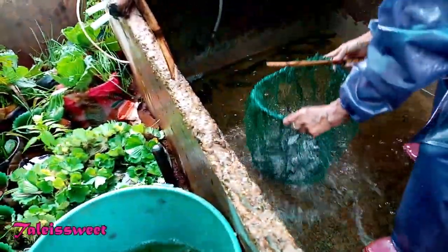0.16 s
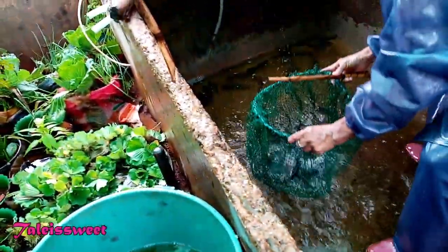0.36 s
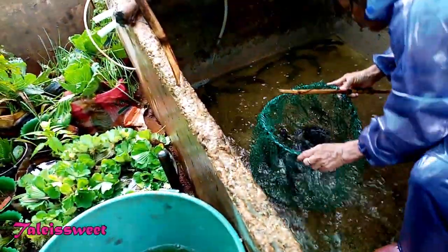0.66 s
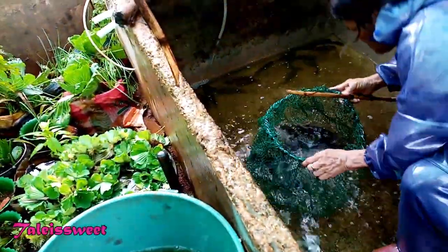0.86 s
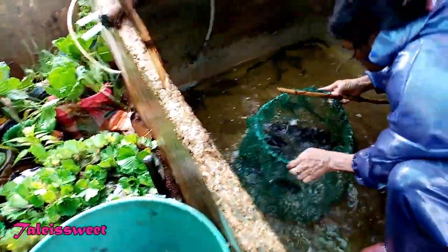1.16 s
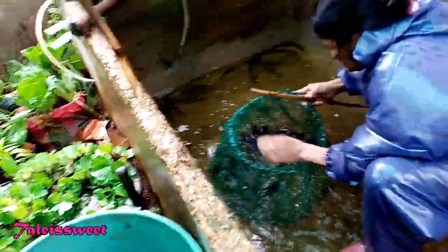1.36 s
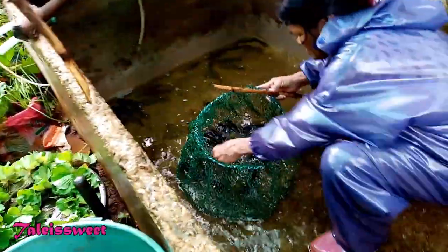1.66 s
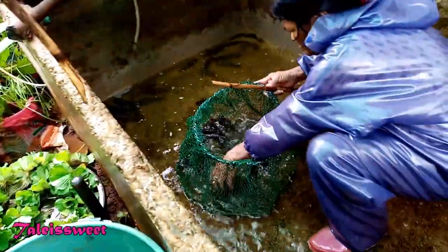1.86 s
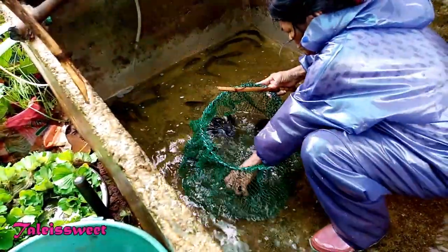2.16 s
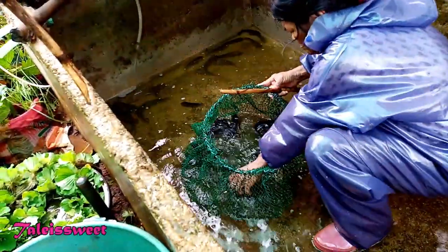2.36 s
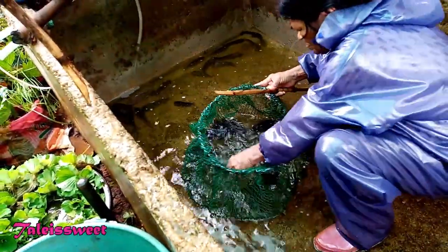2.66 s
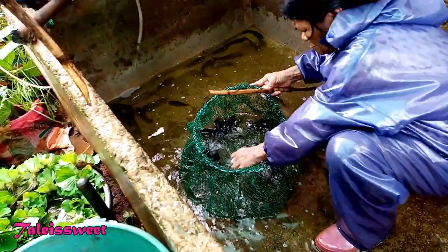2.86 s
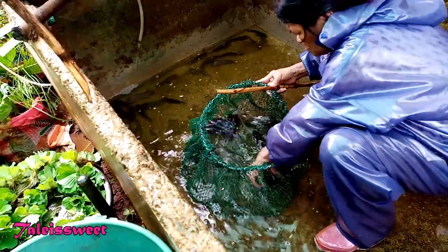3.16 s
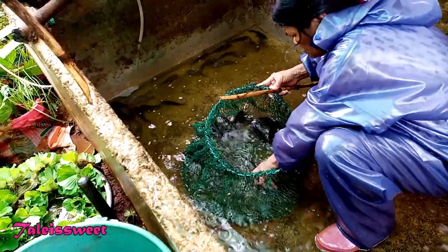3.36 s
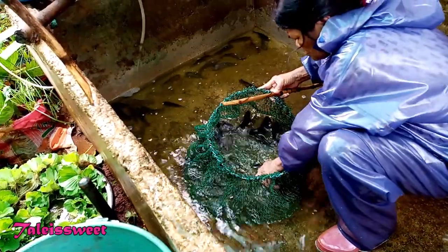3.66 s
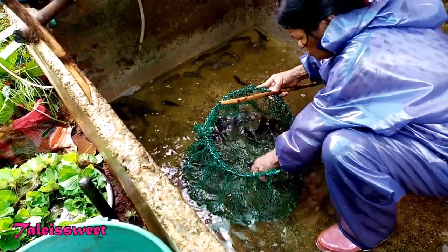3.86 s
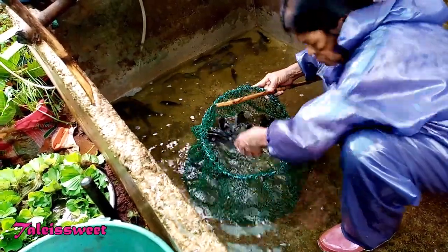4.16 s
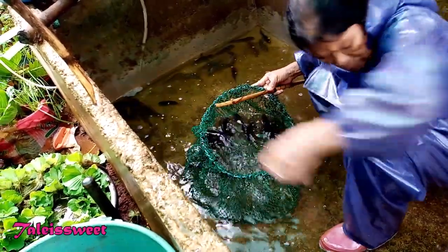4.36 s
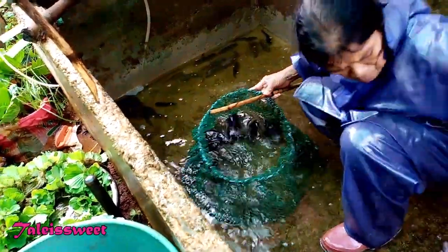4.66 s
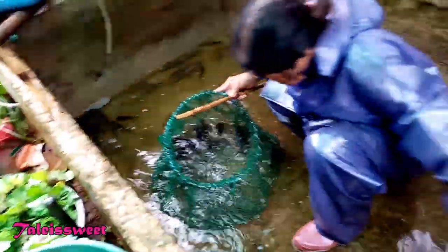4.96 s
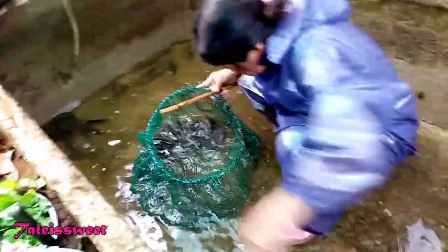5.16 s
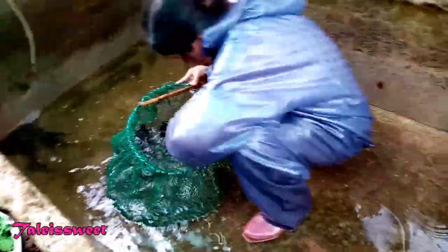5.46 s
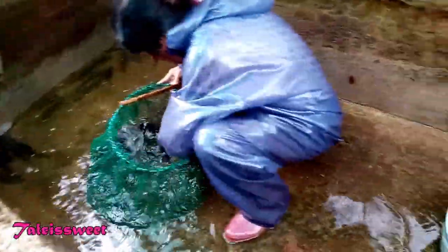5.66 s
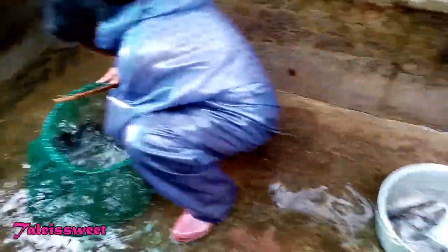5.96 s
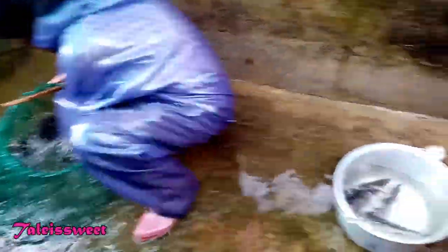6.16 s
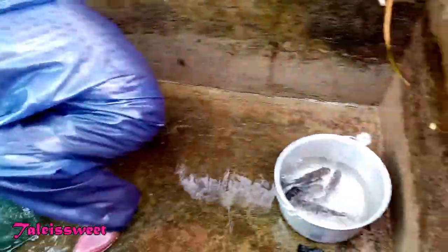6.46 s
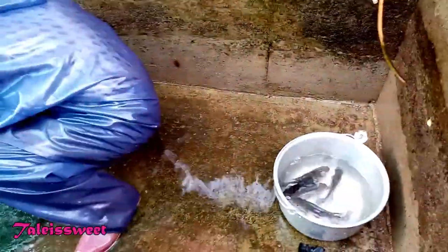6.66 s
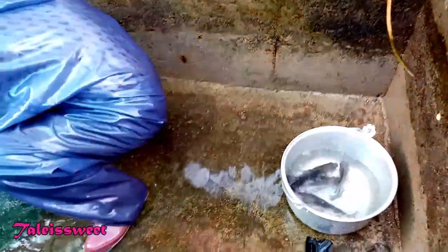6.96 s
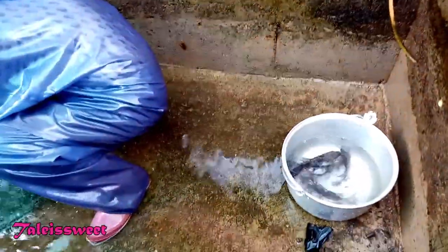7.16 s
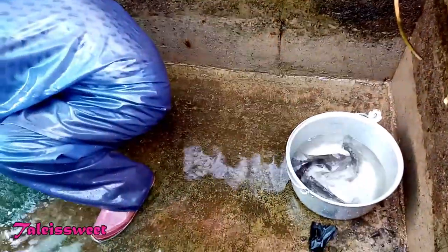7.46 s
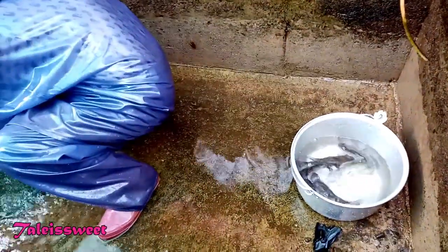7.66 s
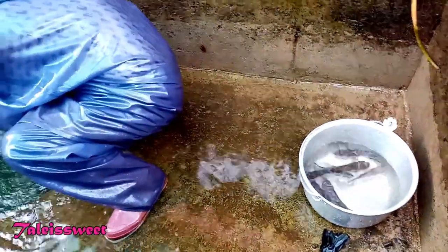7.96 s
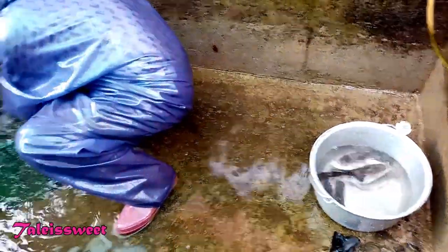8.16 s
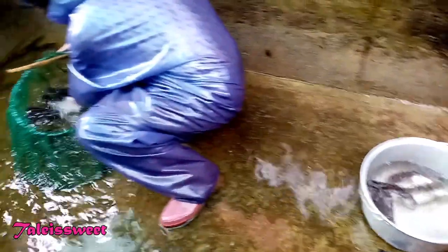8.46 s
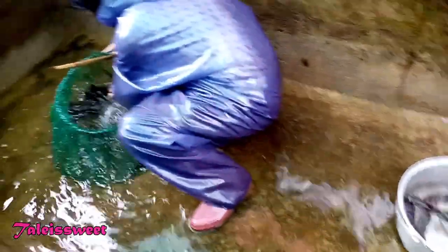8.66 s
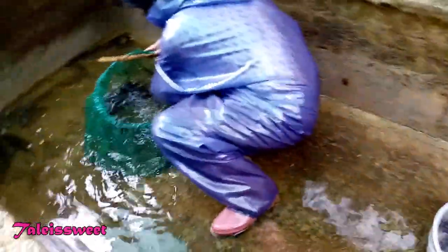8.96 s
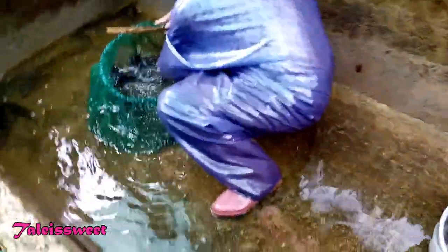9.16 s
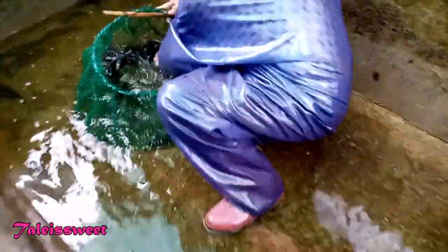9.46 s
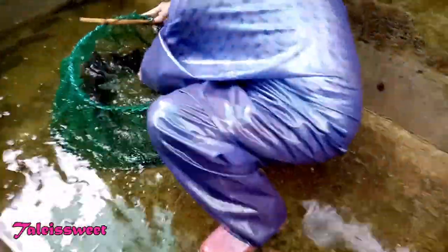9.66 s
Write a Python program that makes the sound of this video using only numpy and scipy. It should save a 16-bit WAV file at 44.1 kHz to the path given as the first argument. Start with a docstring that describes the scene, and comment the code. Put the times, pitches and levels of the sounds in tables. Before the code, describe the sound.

Close splashing in shallow water comes in short, uneven bursts as a hand moves through a net of wriggling fish. Bubbles gurgle, tails slap and drops ping between strokes. The splashes start strong, settle, then turn busier and louder in the second half, with a few hollow laps and dull gulps. Concrete pond walls add a brief echo, and a far motor hums faintly under light hiss.

```python
"""Fish thrash in a hand net in the shallow water of a concrete pond while someone gropes among them.
Each stroke folds in air, which resonates as gurgling bubbles, and throws spray over a steady trickle.
Tails slap, drops fall, air pockets plop, water laps hollowly, and there are a few dull knocks and gulps.
Reflections from the pond walls add a short ring; a far motor's hum and faint hiss lie below.
Of the two spaced microphone ports, the left is shielded and duller."""
import sys
import numpy as np
from scipy import signal
from scipy.fft import rfft, irfft
from scipy.io import wavfile
from scipy.ndimage import uniform_filter1d, map_coordinates

SR = 44100
rng = np.random.default_rng(int(sys.argv[2]) if len(sys.argv) > 2 else 0)


def inscribe(sig):
    """Save sig as 16-bit PCM at rate SR to the path in sys.argv[1].

    A 1-D sig is mono; a 2-D sig holds one channel per row.
    Samples are clipped to [-1, 1] before scaling.
    """
    pcm = np.round(np.clip(np.atleast_2d(sig).T, -1, 1) * 32767)
    wavfile.write(sys.argv[1], SR, pcm.astype(np.int16))


N = 433062
T = np.arange(N) / SR

# strokes of a fish, the hand or the net through the water: start_s, hold_s, gurgle_db, spray_db
STROKES = [(-0.022, 0.14, -39, -31.5), (0.172, 0.12, -43.5, -38), (0.53, 0.021, -42, -41),
           (0.749, 0.025, -42, -43), (0.876, 0.13, -49, -42), (1.141, 0.036, -49, -45),
           (1.393, 0.034, -37.5, -33.5), (1.57, 0.15, -48.5, -44.5), (1.748, 0.082, -48, -46.5),
           (2.365, 0.03, -51, -43.5), (2.454, 0.071, -48, -45.5), (2.604, 0.19, -55, -44.5),
           (2.821, 0.096, -49, -40.5), (2.927, 0.054, -43.5, -37.5), (3.274, 0.1, -44.5, -39.5),
           (3.421, 0.061, -48.5, -41.5), (3.872, 0.052, -48, -50), (4.176, 0.11, -56.0, -46.5),
           (4.728, 0.019, -41.5, -36.5), (4.818, 0.027, -47, -39.5), (4.935, 0.11, -44.5, -38.5),
           (5.068, 0.036, -38, -35), (5.183, 0.059, -42, -36.0), (5.664, 0.043, -44.0, -43),
           (5.863, 0.064, -42, -45.0), (5.953, 0.056, -42, -35), (6.077, 0.1, -39.5, -35.5),
           (6.203, 0.03, -37, -30.5), (6.265, 0.065, -36.5, -30), (6.357, 0.062, -38.5, -30),
           (6.464, 0.043, -43, -38.5), (6.634, 0.026, -48.5, -44), (6.704, 0.029, -38.0, -36.5),
           (6.861, 0.18, -37, -34.5), (7.325, 0.094, -39.5, -36.5), (7.668, 0.1, -43, -38.5),
           (7.81, 0.058, -41.5, -38), (8.037, 0.17, -43.0, -38.5), (8.415, 0.17, -43, -37.5),
           (8.826, 0.049, -49, -40), (9.009, 0.12, -46.5, -41.5), (9.222, 0.037, -46.5, -40),
           (9.678, 0.068, -51.5, -42.5)]
# water trickling between strokes: time_s, gurgle_db, spray_db
TRICKLE = [(0.0, -41, -33), (0.45, -47.5, -44), (1.05, -52, -47), (1.3, -61, -52), (1.65, -56, -47),
           (2.15, -66, -55), (3.3, -53, -45), (4.08, -66, -59), (4.68, -63, -58), (5.2, -53, -49),
           (5.45, -60.5, -53), (5.8, -61, -47.5), (6.5, -49.5, -43), (7.05, -51, -44), (7.25, -60, -44),
           (7.55, -52.5, -45), (7.95, -57, -44), (8.36, -62, -50.5), (8.6, -58, -51.5), (9.4, -69.5, -54),
           (9.82, -59.5, -45.5)]
# spectrum of the entrained air: frequency_hz, level_db
GURGLE_SPECTRUM = [(250, -27.5), (560, -14), (760, -0.5), (950, -5), (1400, 0.5), (3200, 1), (5000, -12)]
# spectrum of droplets striking the surface: frequency_hz, level_db
SPRAY_SPECTRUM = [(1200, -12.5), (2600, -4), (3600, -3.5), (5000, 1), (6400, 3.5), (7500, -2.5),
                  (9000, -0.5), (10500, -9), (14000, -13.5), (15000, -3), (16000, -12.5)]
# slaps of fish and falling water: start_s, level_db, bubble_pitch_hz, crackle_t60_s
SLAPS = [(0.031, -24, 6400, 0.0028), (0.143, -31, 8200, 0.0073), (0.391, -30.5, 8350, 0.0065),
         (0.834, -32, 6230, 0.089), (1.407, -31.5, 6250, 0.019), (1.996, -37, 10400, 0.0028),
         (2.841, -31.5, 6530, 0.0039), (2.869, -30.5, 5020, 0.008), (2.995, -29, 6040, 0.024),
         (3.152, -27, 6170, 0.048), (3.289, -30, 5994, 0.013), (4.975, -21.5, 4620, 0.016),
         (5.067, -24, 4170, 0.051), (5.205, -25.5, 5100, 0.032), (6.879, -27.5, 6520, 0.0055),
         (6.918, -25, 5006, 0.0073), (6.984, -24.5, 4600, 0.011), (7.065, -27.5, 6340, 0.0059),
         (7.142, -29.5, 9900, 0.003), (7.344, -26.5, 6690, 0.0053), (8.439, -22.5, 6450, 0.02),
         (8.534, -26.5, 6230, 0.059), (9.009, -31.5, 6850, .018), (9.232, -28.5, 6060, .012),
         (9.247, -26, 6340, 0.0095)]
# large air pockets pinching off: start_s, level_db, pitch_hz
PLOPS = [(0.058, -38.5, 920), (0.095, -37.5, 990), (0.12, -35, 1020), (0.489, -38, 1680),
         (0.553, -38.5, 1030), (0.683, -42, 797.4), (0.766, -45, 1390), (1.422, -34.5, 2280),
         (2.469, -31, 2303), (2.897, -46.5, 768.5), (2.998, -26.5, 2540), (3.715, -42, 2926),
         (3.917, -37, 1454), (4.747, -39, 2914), (4.855, -37.5, 1590), (5.02, -38, 1700),
         (5.099, -35.5, 1002), (5.676, -37, 1418), (5.984, -28, 1966), (6.096, -30, 2009),
         (6.274, -28, 1293), (6.33, -38, 1000), (6.402, -29, 2235), (6.716, -38, 1080), (6.914, -29, 1313),
         (6.972, -23, 1934), (7.168, -46, 1141), (7.387, -30, 2281), (7.585, -47, 1447),
         (7.701, -27.5, 1547), (7.735, -30.5, 2602), (7.825, -33, 1500), (8.083, -39, 1484),
         (8.835, -35, 2052), (9.03, -31, 2403)]
# cavities that open (pitch falls) or close (pitch rises): start_s, length_s, level_db, first_hz, last_hz
GLUGS = [(0.903, 0.063, -35, 2917, 1450), (1.876, 0.049, -33, 2890, 1308), (2.287, 0.048, -38, 2150, 1000),
         (2.507, 0.011, -42, 716, 1888), (3.331, 0.045, -30, 2870, 1503), (3.387, 0.022, -37.5, 686, 1490),
         (3.526, 0.019, -39, 693, 1050), (3.876, 0.02, -38.5, 620, 1144), (4.911, .04, -27.5, 2690, 988),
         (5.406, 0.015, -35, 1600, 1350), (5.427, 0.026, -33, 676.5, 1710),
         (7.061, 0.031, -24.5, 2390, 1503), (8.407, 0.059, -35, 2505, 951)]
# clear drops ringing on the surface: start_s, level_db, pitch_hz
PLINKS = [(0.511, -28.5, 6400), (1.815, -29, 4900), (2.153, -38, 5280), (3.493, -26.5, 5820),
          (3.873, -30, 4130), (5.177, -35, 6430), (5.528, -31, 6490), (6.177, -29, 6353),
          (6.686, -34, 6730), (7.086, -28, 6330), (8.032, -30.5, 6230), (9.13, -30, 6630)]
# hollow laps of water: start_s, level_db
LAPS = [(0.884, -43), (1.978, -48), (2.372, -42.5), (3.53, -38), (3.597, -42), (6.551, -39), (7.383, -41.5),
        (8.474, -35.5), (8.532, -39.5), (8.635, -55), (8.865, -45), (9.184, -43), (9.224, -40.5)]
# the two close tones of a lap: pitch_hz
LAP_TONES_HZ = [845.6, 920]
# dull knocks and deep gulps: start_s, level_db, pitch_hz
GULPS = [(2.507, -42, 465.6), (4.306, -43, 414.1), (4.523, -47.5, 447.3), (4.746, -43, 352.6),
         (4.975, -30.5, 506.4), (5.355, -39, 437.7), (6.9, -40.5, 580), (7.766, -36, 493.6),
         (7.811, -39, 480.7), (8.122, -38, 712), (9.669, -46.5, 750)]
# low wash of moving water: time_s, level_db
WASH_LEVEL = [(0, -45), (.5, -52.5), (1.6, -54.5), (2.05, -65), (4.0, -65), (4.3, -59), (5.3, -57),
              (5.7, -58.5), (6.7, -67.5), (9.8, -72)]
# spectrum of that wash: frequency_hz, level_db
WASH_SPECTRUM = [(30, -18), (75, -2.5), (130, -1.5), (340, 2), (470, 1.5), (620, -7), (4000, -53)]
# rotation of the far motor: time_s, turns_per_s
MOTOR_SPEED = [(0.2, 38), (0.95, 39.5), (1.7, 40.6), (5.4, 39), (6.3, 41.2)]
# hum of the motor: time_s, level_db
HUM_LEVEL = [(0, -66), (0.8, -53.5), (1.65, -60), (2.0, -66), (3.3, -62), (3.8, -75), (5.1, -66.5),
             (5.6, -57.5), (6.3, -56), (6.5, -72.5), (9.8, -74)]
# harmonics of its rotation, from the second up: level_db
HUM_HARMONICS_DB = [-2.5, -7, -2.5, -7, -13.5, -21, -6]
# spectrum of the faint hiss: frequency_hz, level_db
HISS_SPECTRUM = [(30, -15), (90, 2), (220, -6), (430, -19.5), (700, -26), (1200, -1.5), (3000, -4.5),
                 (6500, 1), (7600, 1), (10000, -8.5), (13500, -12), (15000, -3.5)]
# top treble of the water, which dulls once the crouching body screens the net: time_s, gain_db
TREBLE_GAIN = [(0, 3), (1.2, -2.5), (4.6, -6), (5.2, 1.5), (7.2, 0), (8.6, -10), (9.8, -3)]
# earlier arrival of the direct sound at the left port: time_s, lead_ms
LEFT_LEAD = [(0, 0.94), (2.5, 1.21), (4.5, 1.115), (5.1, 0.67), (6.0, 1.35), (8.3, 1.48), (9.2, 1.026),
             (9.8, 1.28)]
# partly blocked straight path to the left port: frequency_hz, gain_db
LEFT_DIRECT_PATH = [(400, 0.5), (1500, -3.5), (4000, -5), (9000, -5.5)]
# shielding of all sound at the left port: frequency_hz, gain_db
LEFT_SHIELDING = [(300, -2), (500, -5.5), (820, -1.5), (1350, -0.5), (2400, -1), (3500, -2.5), (5000, -8),
                  (6500, -9), (8100, -17.5), (10000, -12), (13000, -16.5), (15500, -24)]

USUAL_DB = -41   # reference level of the churning


def stroke_levels(attack_s=.017, sag_db_per_s=8, release_db_per_s=200):
    """Incoherent sources add in power: strokes and trickle sum to a gurgle level and a spray level in dB."""
    spatter_db, lead_in_db_per_s, spatter_db_per_s = -15, 280, 130
    power = from_db(in_time(TRICKLE)) ** 2
    for start_s, hold_s, *levels_db in STROKES:
        span = slice(max(int((start_s - .5) * SR), 0), int((start_s + 1) * SR))
        age = T[span] - start_s
        before_s, after_s = np.maximum(-age, 0), np.maximum(age - hold_s, 0)
        stroke = np.clip(age / attack_s, 0, 1) * from_db(-sag_db_per_s * age - release_db_per_s * after_s)
        # water stirs before a stroke and spatters after it
        spatter = from_db(spatter_db - lead_in_db_per_s * before_s - spatter_db_per_s * after_s)
        power[:, span] += np.outer(from_db(levels_db), np.maximum(stroke, spatter)) ** 2
    surge_db = 2 * drift(per_s=22)
    return 10 * np.log10(power) + surge_db


def gurgle_pitch(level_db, settle_s=0.052):
    """Resonance falls with bubble size: a stroke starts with small bubbles that grow as its cavity opens."""
    pole = np.exp(-1 / (settle_s * SR))
    onset_db = signal.lfilter([pole, -pole], [1, -pole], level_db - level_db[0])
    return 1600 * 2 ** (0.035 * onset_db - 0.02 * (level_db + 44) + .2 * drift(22))


def gurgle(level_db):
    """Air entrainment: bubbles ring singly in a trickle and merge into a rush under hard churning."""
    centre_hz = gurgle_pitch(level_db)
    per_s = np.clip(260 * from_db(.6 * (level_db + 45)), 60, 900)
    bubbles = swarm(per_s, centre_hz, octaves=1.985, cycles=24, rise=0.41, spread_db=3, size=1400)
    rush = 0
    for hz in 600 * 2 ** (np.arange(7) / 2.4):
        off_centre_db = -3.5 * np.log2(hz / centre_hz) ** 2
        noise = unit_rms(band(rng.standard_normal(N), hz, octaves=0.37))
        rush = rush + noise * from_db(off_centre_db + 3 * drift(50))
    bubbles = evened(colour(bubbles, GURGLE_SPECTRUM))
    rush = evened(colour(rush, GURGLE_SPECTRUM))
    rush_db = -1.17 + 0.15 * (level_db - USUAL_DB)
    return from_db(level_db) * (from_db(-1.5) * bubbles + from_db(rush_db) * rush)


def spray(level_db):
    """Droplet impacts radiate ticks and entrain tiny bubbles; the patter comes in clumps."""
    per_s = np.clip(750 * from_db(.8 * (level_db + 42)), 120, 2400)
    fizz = swarm(per_s, centre_hz=5200, octaves=1.9, cycles=18, rise=.2, spread_db=3.8, size=400)
    impacts = (rng.random(N) < 2.4 * per_s / SR) * rng.standard_normal(N)
    ticks = evened(impacts * from_db(3.94 * np.minimum(rng.exponential(1, N), 4.5)))
    fizz = unit_rms(colour(fizz, SPRAY_SPECTRUM))
    ticks = unit_rms(colour(ticks, SPRAY_SPECTRUM))
    return from_db(level_db + 1.6 * drift(70)) * (from_db(-1.5) * fizz + ticks)


def slosh(gurgle_db):
    """Displacement: the mass of water that a stroke shifts adds a soft low body."""
    body = unit_rms(band(rng.standard_normal(N), hz=330, octaves=1.9))
    return from_db(gurgle_db - 23 + 6.7 * drift(30)) * body


def slaps():
    """Impact excitation: a click, a crackle, a puff of like-sized bubbles and one that rings clearly."""
    crackle, pings = np.zeros(N), np.zeros(N)
    for start_s, db, hz, t60_s in SLAPS:
        add(pings, start_s, db - 5, band(burst(.0015), 1.15 * hz, octaves=1.3, order=1))
        add(crackle, start_s, db + 0.5, burst(t60_s) * from_db(4.3 * rng.standard_normal(6000)))
        add(pings, start_s, db + 0.5, band(burst(t60_s), hz, octaves=0.49))
        add(pings, start_s, db - 3, bubble(hz, cycles=83, rise=0.029))
    return colour(crackle, SPRAY_SPECTRUM) + pings


def plops(gurgle_db, stray_hz=2412, stray_octaves=1.68):
    """Pinch-off sets air pockets and random stray bubbles into volume oscillation amid a little splash."""
    out = np.zeros(N)
    strays = [(start_s, db + 2.5, stray_hz * 2 ** (stray_octaves * place))
              for start_s, db, place in scattered(gurgle_db, per_s=7, spread_db=0.94)]
    for start_s, db, hz in list(PLOPS) + strays:
        add(out, start_s, db, bubble(hz * 0.983, cycles=32, rise=0.092))
        add(out, start_s, db - 3.5, band(burst(0.039), hz, octaves=1.35))
    return out


def glugs(step_s=.011, fade_db=15, scatter_octaves=0.046):
    """Size sets resonance: a changing cavity sheds an uneven run of bubbles that step along a glide."""
    out = np.zeros(N)
    for start_s, length_s, db, first_hz, last_hz in GLUGS:
        count = max(round(length_s / step_s), 1) + 1
        jitter, detune, scatter_db = rng.standard_normal((3, count))
        for k in range(count):
            progress = np.clip((k + .25 * jitter[k] * (k > 0)) / (count - 1), 0, 1)
            birth_s = start_s + length_s * progress
            hz = first_hz * (last_hz / first_hz) ** progress * 2 ** (scatter_octaves * detune[k])
            level_db = db - 2 - fade_db * progress + scatter_db[k]
            add(out, birth_s, level_db, bubble(hz, cycles=36, rise=0.059))
            add(out, birth_s, level_db - 4.5, band(burst(0.039), hz, octaves=1.5))
    return out


def plinks(t60_s=0.022):
    """Bubble entrapment: a drop ticks, splashes finely and traps one tiny bubble that rings on."""
    out = np.zeros(N)
    for start_s, db, hz in PLINKS:
        add(out, start_s, db - 8, band(burst(0.0018), hz, octaves=1.4, order=1))
        add(out, start_s, db - 2.5, band(burst(t60_s), hz, octaves=0.28))
        add(out, start_s, db - 1.5, bubble(hz, cycles=t60_s * hz, rise=0.018))
    return out


def drips(spray_db, centre_hz=6210):
    """Impact and bubble resonance: lone drops from the net and the sleeve each tick and ping."""
    ticks, pings = np.zeros(N), np.zeros(N)
    for start_s, db, place in scattered(spray_db, per_s=22, spread_db=2.5):
        add(ticks, start_s, db + 0.5, burst(0.0024, size=600))
        add(pings, start_s, db - 2.5, bubble(centre_hz * 2 ** place, cycles=124, rise=0.22, size=900))
    return colour(ticks, SPRAY_SPECTRUM) + pings


def laps(swell_s=0.0053, t60_s=0.12):
    """Beating: a lap swells with a wet slop and rings on in two close tones that interfere."""
    out, age = np.zeros(N), T[:SR // 2]
    envelope = (1 - np.exp(-age / swell_s)) * from_db(-60 * age / t60_s)
    for start_s, db in LAPS:
        tones = sum(from_db(4.1 * rng.standard_normal()) * np.sin(2 * np.pi * (hz * age + rng.random()))
                    for hz in LAP_TONES_HZ)
        add(out, start_s, db - 1, envelope * tones)
        add(out, start_s, db, band(burst(0.063), np.mean(LAP_TONES_HZ), octaves=0.58))
    return out


def gulps():
    """Damped resonance: a deep ring dies quickly under a soft thud."""
    out = np.zeros(N)
    for start_s, db, hz in GULPS:
        add(out, start_s, db, bubble(hz, cycles=33, rise=0.091))
        add(out, start_s, db - 1, band(burst(0.25), hz, octaves=1.48))
    return out


def wash():
    """Amplitude-modulated noise: moving water makes an uneven low wash."""
    level_db, = in_time(WASH_LEVEL)
    return from_db(level_db + 4.1 * drift(20)) * unit_rms(colour(rng.standard_normal(N), WASH_SPECTRUM))


def motor_hum():
    """Harmonic series: a far motor hums at multiples of its slowly changing rate of rotation."""
    level_db, = in_time(HUM_LEVEL)
    turns_per_s, = in_time(MOTOR_SPEED)
    turns = np.cumsum(turns_per_s) / SR
    hum = sum(from_db(db + 3.4 * drift(6)) * np.sin(2 * np.pi * harmonic * turns)
              for harmonic, db in enumerate(HUM_HARMONICS_DB, 2))
    return from_db(level_db) * unit_rms(hum)


def hiss():
    """Stationary noise: a faint, even hiss."""
    return from_db(-51) * unit_rms(colour(rng.standard_normal(N), HISS_SPECTRUM))


def body_shadow(x, corner_hz=10200):
    """Acoustic shadow: the top treble rises and falls as the crouching body clears or screens the net."""
    below = signal.sosfilt(signal.butter(1, corner_hz, fs=SR, output="sos"), x)
    gain_db, = in_time(TREBLE_GAIN)
    return below + from_db(gain_db) * (x - below)


def walls(x, early_db, late_db, late_t60_s, early_t60_s=0.047, size=10000, hop=1024):
    """Reverberation: near walls scatter, then the basin rings; moving splashes keep changing the echoes."""
    age = T[:size]
    early = from_db(-60 * age / early_t60_s) * (age > .001)
    late = from_db(-60 * age / late_t60_s) * (1 - np.exp(-age / 0.003))
    decay = np.hypot(from_db(early_db) * early / np.linalg.norm(early),
                     from_db(late_db) * late / np.linalg.norm(late))
    crossfade = np.sin(np.pi * np.arange(2 * hop) / (2 * hop))
    out = np.zeros(N + size + 3 * hop)
    x = np.pad(x, (hop, 2 * hop))
    for at in range(0, N + hop, hop):
        echo = signal.fftconvolve(x[at:at + 2 * hop] * crossfade, decay * rng.standard_normal(size))
        out[at:at + len(echo)] += echo
    return out[hop:hop + N]


def left_path(direct):
    """Path difference: direct sound reaches the left port earlier, and partly blocked."""
    lead_ms, = in_time(LEFT_LEAD)
    ahead = map_coordinates(direct, [np.arange(N) + lead_ms * SR / 1000], order=3)
    return colour(ahead, LEFT_DIRECT_PATH)


def bubble(hz, cycles, rise, size=6000):
    """Damped oscillator: a bubble loses 60 dB over `cycles`, its pitch rising as it nears the surface."""
    life = T[:size] * hz / cycles
    phase = 2 * np.pi * np.cumsum(hz * (1 + rise * np.minimum(life, 1))) / SR
    swell = 1 - np.exp(-(life * cycles) ** 2)
    return np.sin(phase) * from_db(-60 * life) * swell


def swarm(per_s, centre_hz, octaves, cycles, rise, spread_db, size):
    """Superposition: bubbles of random birth, pitch and strength sum to a texture of even level."""
    births = np.flatnonzero(rng.random(N) < per_s / SR)
    place, strength, polarity = rng.random((N // 8, 3))[:len(births)].T
    pitches_hz = np.broadcast_to(centre_hz, N)[births] * 2 ** (octaves * (place - .5))
    levels_db = spread_db * np.minimum(-np.log(strength), 4)
    gains = from_db(levels_db) * np.sign(polarity - .5) * np.sqrt(pitches_hz)
    out = np.zeros(N + size)
    for at, hz, gain in zip(births, pitches_hz, gains):
        out[at:at + size] += gain * bubble(hz, cycles, rise, size)
    return evened(out[:N])


def scattered(level_db, per_s, spread_db, follows=0.51):
    """Random arrivals, louder with the churning: start_s, level_db, place in pitch range (-.5 to .5)."""
    wait, strength, place = rng.random((600, 3)).T
    start_s = np.cumsum(-np.log(wait)) / per_s
    swing_db = np.interp(start_s, T, level_db) - USUAL_DB
    db = USUAL_DB + follows * swing_db + spread_db * np.minimum(-np.log(strength), 2.8)
    return np.transpose([start_s, db, place - .5])[start_s < T[-1]]


def burst(t60_s, size=6000):
    """Exponential decay: noise that falls 60 dB in t60_s."""
    return rng.standard_normal(size) * from_db(-60 * T[:size] / t60_s)


def add(track, start_s, db, sound):
    """Equal energy: place a sound with the energy of 10 ms at the given level."""
    at = max(round(start_s * SR), 0)
    sound = sound * from_db(db) * np.sqrt(0.01 * SR / np.sum(sound ** 2))
    track[at:at + len(sound)] += sound[:N - at]


def band(x, hz, octaves, order=2):
    """Band-pass filter of a given width around a pitch."""
    edges_hz = np.clip(hz * 2 ** (np.array([-.5, .5]) * octaves), 20, [SR / 2 - 900, SR / 2 - 500])
    return signal.sosfilt(signal.butter(order, edges_hz, "band", fs=SR, output="sos"), x)


def colour(x, spectrum):
    """Minimum-phase (causal) filter that follows a spectrum."""
    hz, db = np.transpose(spectrum)
    grid_hz = np.linspace(1, SR / 2, 2049)
    gain = from_db(np.interp(np.log(grid_hz), np.log(hz), db))
    cepstrum = irfft(np.log(gain))
    causal_fold = 1 + np.sign(np.fft.fftfreq(len(cepstrum)))
    impulse_response = irfft(np.exp(rfft(cepstrum * causal_fold)))
    return signal.oaconvolve(x, impulse_response)[:N]


def evened(x):
    """Running normalisation: divide out the level of the surrounding 60 ms."""
    return x / np.sqrt(np.abs(uniform_filter1d(x ** 2, 2600)) + 0.011 * np.mean(x ** 2))


def drift(per_s):
    """Random modulation of unit spread, joining per_s values a second."""
    knots = rng.standard_normal(4096)
    return unit_rms(map_coordinates(knots, [T * per_s], order=1, mode="wrap"))


def in_time(rows):
    """Linear interpolation of each column of a curve at every sample."""
    time_s, *columns = np.transpose(rows)
    return [np.interp(T, time_s, column) for column in columns]


def unit_rms(x):
    """Normalisation to a mean power of one."""
    return x / np.sqrt(np.mean(x ** 2) + 1e-20)


def from_db(db):
    """Amplitude ratio of a level in decibels."""
    return 10 ** (np.asarray(db) / 20)


def scene():
    """Direct and reflected sound superpose at two spaced ports; the shielded left hears more wall echo."""
    gurgle_db, spray_db = stroke_levels()
    churn = gurgle(gurgle_db) + spray(spray_db)
    lows = gulps() + slosh(gurgle_db) + motor_hum() + wash()
    left_hiss, right_hiss = hiss(), hiss()
    hits = slaps() + plinks() + plops(gurgle_db) + laps() + glugs() + drips(spray_db)
    # the churning and the hits carry little sound below about 500 Hz
    low_cut = signal.butter(4, 530, "high", fs=SR, output="sos")
    churn, hits = signal.sosfilt(low_cut, body_shadow(np.array([churn, hits])))
    # one hollow note keeps ringing in the water's sound
    hits = hits + from_db(0.5) * band(churn + hits, hz=946, octaves=0.16, order=1)
    direct = from_db(-2) * churn + from_db(-5) * hits + lows
    left_echo = walls(churn + hits, early_db=-0.5, late_db=-11, late_t60_s=0.23)
    right_echo = walls(from_db(0.5) * churn + hits, early_db=-4.5, late_db=-12, late_t60_s=0.33)
    left = from_db(-3.5) * colour(left_path(direct) + left_echo + left_hiss, LEFT_SHIELDING)
    right = direct + right_echo + right_hiss
    return np.array([left, right])


def record(dry, cutoff_hz=15900):
    """Band limiting: a steep low-pass filter cuts the top treble."""
    return signal.sosfilt(signal.ellip(12, .2, 80, cutoff_hz, fs=SR, output="sos"), dry)


dry = scene()
out = record(dry)
inscribe(out)
```